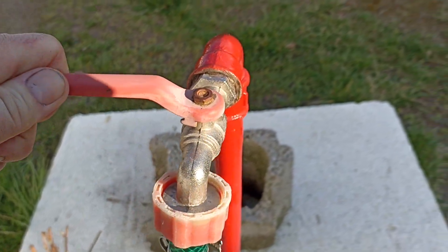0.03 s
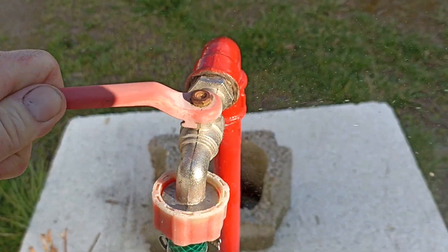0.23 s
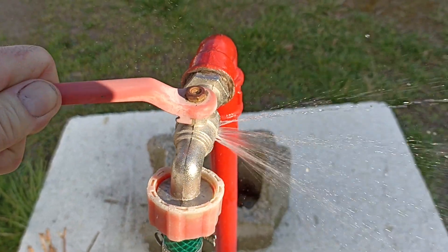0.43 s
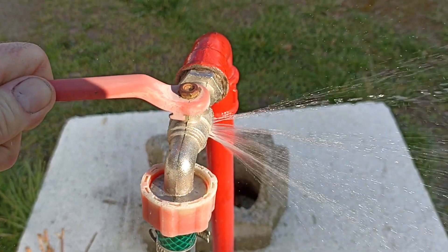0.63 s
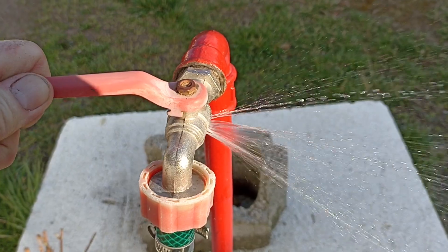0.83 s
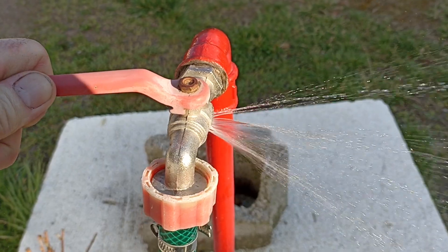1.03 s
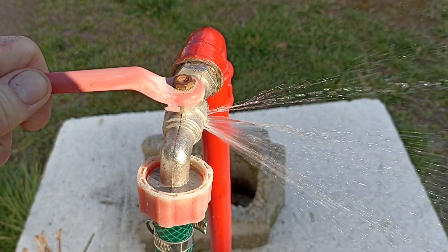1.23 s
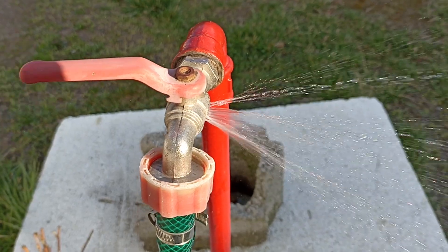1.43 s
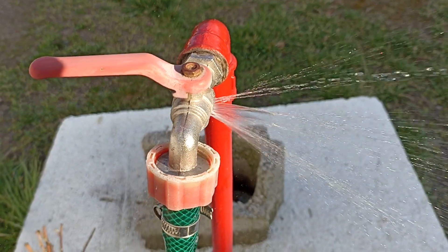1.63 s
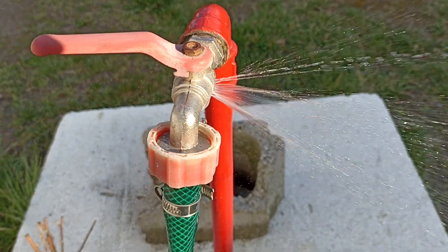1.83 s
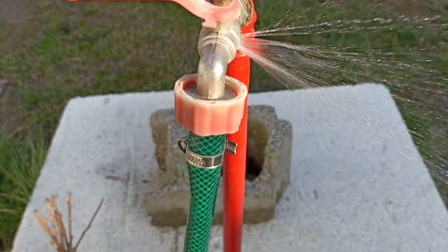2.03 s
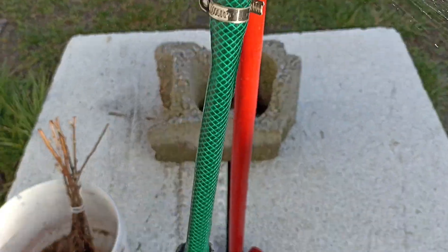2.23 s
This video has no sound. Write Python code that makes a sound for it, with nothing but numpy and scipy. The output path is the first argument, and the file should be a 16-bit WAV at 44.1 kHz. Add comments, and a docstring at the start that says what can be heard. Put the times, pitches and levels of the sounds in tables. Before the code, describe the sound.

A leaking garden tap opens with a rush and keeps spraying with a thin hiss.

```python
"""A garden tap is opened close in front of a stereo microphone: water rushes through the valve and rings
the tap and hose, the hose fills with a gurgle, and the leaking joint settles to a fine, spitting hiss.
The lever ticks as the hand leaves it. Right at the microphone, its holder shifts and steps back with
rubs, rustles and soft bumps. Far off to the right a bird whistles twice over the garden's low rumble."""
import sys
import numpy as np
from scipy import signal
from scipy.fft import rfft, irfft
from scipy.io import wavfile

SR = 44100
rng = np.random.default_rng(int(sys.argv[2]) if len(sys.argv) > 2 else 0)


def file_out(sig):
    """Save sig as 16-bit WAV at sys.argv[1]."""
    # one column per channel
    cols = np.atleast_2d(sig).T
    # limit, then scale
    lim = np.clip(cols, -1, 1)
    pcm = np.round(lim * 32767).astype(np.int16)
    wavfile.write(sys.argv[1], SR, pcm)


N = 101429

# Open air all around. Each row: frequency in Hz, relative level in dB.
AIR_COLOUR = [(25, -30), (48, -23), (70, -1), (110, -3), (200, -2.5), (450, -7.5), (1200, -17), (2000, -7),
              (3000, -32), (6000, -45), (15000, -33)]
# Low rumble of the garden. Each row: time in seconds, level in dB.
RUMBLE_LEVEL = [(0, -72), (.45, -61.5), (.58, -61.5), (.72, -75), (.87, -63), (1.3, -70.5), (2.3, -67.5)]
# Calls of the distant bird. Each row: start in seconds, level in dB.
BIRD_CALLS = [(.925, -52.5), (1.924, -51)]
# The arch of one call. Each row: seconds into the call, pitch in Hz, relative level in dB.
WHISTLE_ARCH = [(0, 2000, -8), (.018, 2800, -10), (.035, 3800, 1), (0.052, 4160, 3), (0.073, 3600, -2),
                (.115, 3113, 7.5), (0.142, 2910, -2)]

# Fingers on the microphone's case; clothes and grass. Each row: time in seconds, level in dB.
RUB_LEVEL = [(0, -62), (.06, -87), (.5, -74), (1.27, -64), (1.36, -50), (1.46, -51.5), (1.52, -58),
             (1.63, -57), (1.75, -50.5), (1.8, -52), (1.87, -49), (1.97, -54), (2.05, -49.5), (2.14, -53),
             (2.2, -57), (2.3, -56.5)]
RUSTLE_LEVEL = [(0, -55.5), (.06, -71.5), (.5, -65), (1.3, -53), (1.4, -54), (1.52, -54.5), (1.65, -57.5),
                (1.75, -47), (1.8, -50), (1.87, -46.5), (2.0, -48.5), (2.14, -46.5), (2.19, -56),
                (2.3, -54.5)]
# Spectra of the rub, rustle and bumps. Each row: frequency in Hz, relative level in dB.
RUB_COLOUR = [(70, -7), (140, -13.5), (200, 3), (310, -6), (500, 3), (750, -9.5), (980, -5.5),
              (1200, -24.5), (3500, -33), (4600, -20.5), (9000, -70)]
RUSTLE_COLOUR = [(80, -22), (300, -8), (900, -6.5), (1300, -2), (1900, 2), (2600, 1.5), (3500, 1),
                 (4600, -8.5), (9000, -19.5)]
BUMP_COLOUR = [(70, -39), (200, -3), (330, -1), (500, 4), (950, -3), (1300, -9.5), (2000, -11),
               (3400, -4.5), (4500, -61), (9000, -42)]
# Bumps of handling and steps. Each row: start in seconds, level in dB, scuff decay in seconds,
# then the case's boom and knock in dB relative to that level.
BUMPS = [(1.348, -42, 0.007, -27, -9), (1.658, -39.5, 0.0089, -17, -0.5), (1.724, -43.5, 0.0028, -2, -9),
         (1.82, -39, 0.015, -7, -13), (1.838, -38, 0.0081, -4, -11), (1.846, -34.5, 0.0033, 6.5, -15),
         (2.032, -44.5, 0.016, -6, 3), (2.096, -37.5, 0.0094, -28, -0.5), (2.108, -33, 0.015, -19, -13),
         (2.267, -40.5, 0.012, -10, -0.5)]
# Where the handling noise sits. Each row: frequency in Hz, left minus right in dB.
HANDLING_PAN = [(200, 0), (900, 0), (2000, -10), (3500, -4), (8000, 1)]

# Fingers leaving the lever. Each row: start in seconds, level in dB.
LEVER_TICKS = [(1.351, -45), (1.385, -46), (1.404, -39.5), (1.421, -42), (1.436, -46)]
# Air slugs in the hose. Each row: start in seconds, level in dB, pitch in Hz, decay in seconds.
GULPS = [(0.332, -46.5, 130, 0.019), (.362, -43, 237, 0.0077), (0.391, -36, 245, 0.011)]
# Spectra of the sources at the tap. Each row: frequency in Hz, relative level in dB.
TICK_COLOUR = [(1200, -30), (2800, 2), (3500, -4), (4300, 7), (5500, -4), (9000, -29)]
GURGLE_COLOUR = [(50, -51), (100, -3), (170, 3), (250, -10.5), (400, -3.5), (680, -1), (1100, -3),
                 (2000, -34)]
SPRAY_COLOUR = [(60, -52), (300, -22.5), (1500, -18.5), (3500, -13), (6000, -6.5), (8000, -17),
                (10000, -11), (11200, -5), (11800, -8), (12800, -4.5), (13800, -5), (15700, -1.5)]
FLOW_COLOUR = [(70, -21), (200, -5.5), (450, -12.5), (900, -3.5), (1250, -7.5), (1600, -5.5), (2500, -5.5),
               (3200, -6), (4400, -2.5), (6300, -4.5), (8000, -7.5), (12000, -15)]
# Course of the gurgle, leak, valve flow, and ringing of hose and tap.
# Each row: time in seconds, relative level in dB.
GURGLE_LEVEL = [(.31, -67), (.337, -44), (.36, -52), (.397, -46.5), (.42, -67), (.5, -97)]
SPRAY_LEVEL = [(.155, -102), (.172, -55.5), (.188, -29.5), (.228, -25.5), (.285, -29), (.338, -27.5),
               (.347, -42), (.357, -34.5), (.41, -37.5), (.45, -33.5), (.5, -39), (.53, -45.5), (.7, -45),
               (.9, -47), (1.45, -47), (2.0, -49), (2.3, -51.5)]
FLOW_LEVEL = [(.155, -76), (.19, -39), (.225, -31.5), (.26, -31), (.3, -34.5), (.335, -37), (.347, -42),
              (.37, -35.5), (.46, -38), (.53, -45), (.63, -47.5), (.675, -43.5), (.73, -46), (.9, -49),
              (1.15, -48.5), (1.3, -55), (1.48, -49.5), (1.62, -51.5), (2.0, -49), (2.12, -55), (2.3, -51)]
HOSE_LEVEL = [(.155, -66.5), (.2, -39), (.23, -29), (.3, -34), (.345, -44.5), (.38, -33.5), (.46, -55.5),
              (.56, -60), (.8, -54), (1.2, -57), (1.6, -58)]
TAP_LEVEL = [(0, -67), (.08, -72.5), (.17, -77), (.21, -38.5), (.245, -27.5), (.31, -36.5), (.46, -44),
             (.53, -49.5), (.63, -63), (.675, -43), (.8, -50.5), (.88, -57), (1.0, -49), (1.2, -55),
             (1.37, -58), (1.48, -50.5), (1.57, -63.5), (2.3, -78)]
# Spits of the leak. Each row: start in seconds, level in dB, decay in seconds, centre in Hz,
# half-width in octaves.
SPITS = [(0.354, -22, .002, 13000, 0.31), (0.368, -25, 0.0027, 12500, 0.99),
         (.507, -27.5, 0.0017, 10600, 0.36), (0.513, -31, 0.0018, 13500, 0.36),
         (0.546, -29, 0.0011, 12900, 0.82), (0.642, -36, 0.0038, 3500, 1.3),
         (0.655, -35.5, 0.0099, 7800, 0.48), (1.551, -40, 0.0027, 3280, 0.58),
         (1.604, -38, 0.0028, 10900, 1.4), (2.001, -34.5, 0.0023, 4750, 0.79),
         (2.051, -38, 0.0017, 6100, 0.35), (2.261, -35, 0.0014, 10500, 1.3)]
# Resonances of the leaking gap. Each row: frequency in Hz, width in Hz, relative level in dB.
GAP_MODES = [(11720, 96, -12), (12170, 620, -20), (12380, 230, -14.5), (13200, 300, -16)]
# Where the leak sits. Each row: frequency in Hz, left minus right in dB.
LEAK_PAN = [(1000, 26), (3300, 0), (5000, 1), (7000, -14), (9000, 9), (11500, 12), (13000, 24.5),
            (15500, 8)]
# Resonances of the air in the empty hose and of the tap body.
# Each row: frequency in Hz, width in Hz, relative level in dB, left minus right in dB.
HOSE_MODES = [(255, 60, -12.5, 0), (662, 41, 2, -1.5), (1057, 19.3, 4.5, -5), (1512, 93, 1.5, -8),
              (2942, 51, 1, 3), (3310, 24, 1.5, 1)]
TAP_MODES = [(2071, 26, 3, 0.5), (2138, 17.4, 3, 7.5), (4710, 110, -2, -9), (5110, 67, -5, 12),
             (6580, 160, -1, -3)]
# A reflection cancels one narrow band at the microphone. Each row: frequency in Hz, gain in dB.
REFLECTION_NOTCH = [(4250, 0), (4480, -12), (4560, -12), (4680, 0)]

SPRAY_LIKENESS, FLOW_LIKENESS = 0.73, 0.53  # share of noise power common to left and right
TIME = np.arange(N) / SR
BIN_HZ = np.maximum(np.fft.rfftfreq(N, 1 / SR), 1)


def undb(db):
    """Decibels to gain."""
    return 10 ** (np.asarray(db) / 20)


def unit(x):
    """Scale to rms 1."""
    return x / np.sqrt(np.mean(x ** 2))


def curve(rows):
    """Gain over time from rows of seconds and dB."""
    return undb(np.interp(TIME, *np.array(rows).T))


def by_hz(rows):
    """Rows of frequency and value, joined on a log axis."""
    hz, value = np.array(rows).T
    return np.interp(np.log(BIN_HZ), np.log(hz), value)


def colour(x, rows):
    """Give a sound a spectrum, at rms 1."""
    return unit(irfft(rfft(x) * undb(by_hz(rows)), N))


def ring(x, hz, width):
    """One resonance, at rms 1."""
    return unit(irfft(rfft(x) / (1 + 1j * (BIN_HZ ** 2 - hz ** 2) / (BIN_HZ * width)), N))


def sides(pan_db):
    """Left and right gains whose mean is 1."""
    gains = undb(np.array([[1], [-1]]) * pan_db / 2)
    return gains / gains.mean(axis=0)


def place(x, pan_db, lag_s):
    """Level and time difference between the microphone's ports; with negative lag the left leads."""
    delay = np.exp(-1j * np.pi * BIN_HZ * lag_s * np.array([[1], [-1]]))
    return irfft(rfft(x) * sides(pan_db) * delay, N)


def pair(likeness):
    """Left and right noise with a shared part."""
    shared = np.sqrt(likeness) * rng.standard_normal(N)
    return shared + np.sqrt(1 - likeness) * rng.standard_normal((2, N))


def flutter(rate_hz, depth_db):
    """A gain that wanders at random."""
    wander = irfft(rfft(rng.standard_normal(N)) / (1 + (BIN_HZ / rate_hz) ** 4), N)
    return undb(depth_db * unit(wander))


def grains(per_s, spread_db):
    """Tiny random impacts of uneven size."""
    size = undb(spread_db * np.minimum(rng.exponential(size=N), 5))
    hits = rng.random(N) < per_s / SR
    return unit(hits * size * np.sign(rng.standard_normal(N)))


def blow(start, attack_s, decay_s):
    """Quick rise and exponential fall."""
    age = np.maximum(TIME - start, 0)
    return np.minimum(age / attack_s, 1) * np.exp(-np.maximum(age - attack_s, 0) / decay_s)


def thud(start, hz, decay_s):
    """One softly struck, well damped mode."""
    return np.sqrt(2) * np.sin(2 * np.pi * hz * (TIME - start)) * blow(start, 0.001, decay_s)


def outdoors():
    """Faint open air and a low rumble, all around the microphone."""
    rumble = ring(ring(pair(0.47), hz=77, width=30), hz=77, width=30)
    air = colour(pair(0.61), AIR_COLOUR) * flutter(rate_hz=3.4, depth_db=1.6)
    return undb(-60.5) * air + curve(RUMBLE_LEVEL) * rumble


def bird():
    """Far off to the right, a whistle swoops up and slides down, with a short outdoor echo."""
    arch_s, arch_hz, arch_db = np.array(WHISTLE_ARCH).T
    song = 0
    for start, level_db in BIRD_CALLS:
        age = TIME - start
        pitch = np.interp(age, arch_s, arch_hz) * flutter(rate_hz=260, depth_db=0.86)
        gain = undb(level_db + np.interp(age, arch_s, arch_db, left=-120, right=-120))
        song = song + gain * np.sin(2 * np.pi * np.cumsum(pitch) / SR)
    reflections = 0.7 * unit(rng.standard_normal((2, N)) * blow(0, 0.002, 0.014)) / np.sqrt(N)
    echo = signal.fftconvolve(song[None], reflections, axes=1)[:, :N]
    return sides(pan_db=-8) * (song + echo)


def handling():
    """Right at the microphone: rubbing fingers, rustle, and bumps that boom and knock in its case."""
    rub = colour(pair(0.86) + 0.55 * grains(500, spread_db=5), RUB_COLOUR)
    rub *= curve(RUB_LEVEL) * flutter(rate_hz=38, depth_db=4)
    rustle = colour(pair(0.48) + 0.65 * grains(700, spread_db=4), RUSTLE_COLOUR)
    rustle *= curve(RUSTLE_LEVEL) * flutter(rate_hz=32, depth_db=2.5)
    scuff = colour(pair(0.84), BUMP_COLOUR)
    bumps = 0
    for start, db, decay_s, boom_db, knock_db in BUMPS:
        boom = undb(boom_db) * thud(start, hz=198, decay_s=0.0054)
        knock = undb(knock_db) * thud(start, hz=505.5, decay_s=0.013)
        bumps = bumps + undb(db) * (scuff * blow(start, 0.0015, decay_s) + boom + knock)
    return place(rub + rustle + bumps, by_hz(HANDLING_PAN), lag_s=-0.000085)


def lever():
    """Close in front, the lever ticks as the hand lets go of it."""
    envelope = sum(undb(db) * blow(start, 0.00027, decay_s=0.0039) for start, db in LEVER_TICKS)
    return place(colour(pair(0.99), TICK_COLOUR) * envelope, pan_db=-3, lag_s=-0.00029)


def gurgle():
    """At centre, water shoves the air down the hose, with a few low gulps."""
    churn = colour(grains(500, spread_db=-6) + 0.76 * pair(0.89), GURGLE_COLOUR)
    gulps = sum(undb(db) * thud(start, hz, decay_s) for start, db, hz, decay_s in GULPS)
    return churn * curve(GURGLE_LEVEL) + gulps


def spits():
    """Air pockets pop through the leak, each in its own band."""
    spectrum = rfft(pair(SPRAY_LIKENESS))
    pops = 0
    for start, db, decay_s, hz, octaves in SPITS:
        band = 1 / (1 + (np.log2(BIN_HZ / hz) / octaves) ** 4)
        pops = pops + undb(db) * blow(start, 0.0003, decay_s) * unit(irfft(spectrum * band, N))
    return pops


def sputter(per_s=43, depth=0.13):
    """The leak's jet surges at random: each surge starts at once and dies away."""
    kicks = (rng.random(N) < per_s / SR) * rng.uniform(0.17, 2.6, N)
    surges = signal.fftconvolve(kicks, blow(0, 0.0002, decay_s=0.0075))[:N]
    return unit(1 + depth * surges)


def spray(drop_share=0.3, gain_db=4):
    """The leak's jet tears into droplets: a sputtering hiss that rings the narrow gap."""
    jet = np.sqrt(1 - drop_share) * pair(SPRAY_LIKENESS)
    jet += np.sqrt(drop_share) * grains(per_s=1200, spread_db=2.5)
    gap = sum(undb(db) * ring(jet, hz, width) for hz, width, db in GAP_MODES)
    hiss = unit(colour(jet, SPRAY_COLOUR) + gap)
    return hiss * curve(SPRAY_LEVEL) * undb(gain_db) * flutter(rate_hz=36, depth_db=-0.93) * sputter()


def ringing(modes):
    """Resonances kept ringing by turbulence and collapsing bubbles."""
    drive = pair(FLOW_LIKENESS) + 0.27 * grains(1800, spread_db=3)
    drive *= flutter(rate_hz=84, depth_db=4.55)
    rings = 0
    for hz, width, db, pan_db in modes:
        mode = ring(ring(drive, hz, width), hz, hz / 4)  # the wider pass trims the skirts
        rings = rings + undb(db) * sides(pan_db) * mode
    return place(unit(rings), pan_db=0.5, lag_s=-0.000377)


def valve(turbulence_db=-2):
    """Close in front, water rushes through the valve and rings the tap, and the hose as it fills."""
    rush = colour(pair(FLOW_LIKENESS) + 0.32 * grains(1500, spread_db=5), FLOW_COLOUR)
    turbulence = undb(turbulence_db) * place(rush, pan_db=-2, lag_s=-0.0003296)
    hose = ringing(HOSE_MODES) * curve(HOSE_LEVEL)
    tap_body = ringing(TAP_MODES) * curve(TAP_LEVEL)
    return turbulence * curve(FLOW_LEVEL) + hose + tap_body


def scene():
    """The tap close in front of the microphone, the garden around it."""
    leak = place(spray() + spits(), by_hz(LEAK_PAN), lag_s=-0.000503)
    tap = irfft(rfft(leak + valve()) * undb(by_hz(REFLECTION_NOTCH)), N)
    return tap + lever() + gurgle() + handling() + bird() + outdoors()


def record(dry):
    """The recorder cuts the deep bass and the very top."""
    low_cut = signal.butter(4, 55, "high", fs=SR, output="sos")
    high_cut = signal.ellip(12, 0.2, 75, 15700, fs=SR, output="sos")
    return signal.sosfilt(high_cut, signal.sosfilt(low_cut, dry))


dry = scene()
out = record(dry)
file_out(out)
```